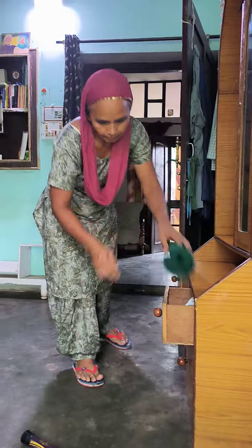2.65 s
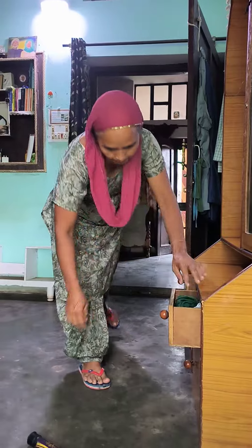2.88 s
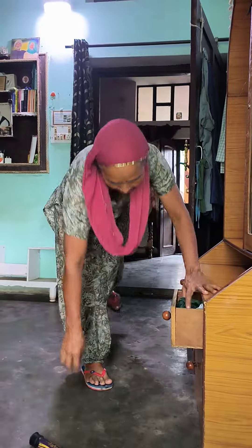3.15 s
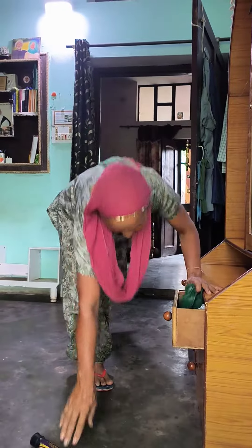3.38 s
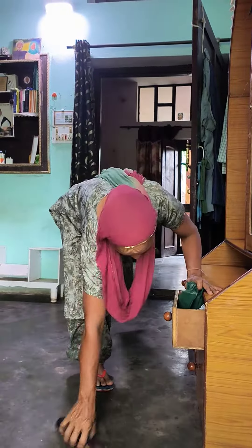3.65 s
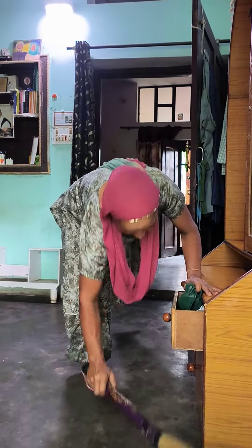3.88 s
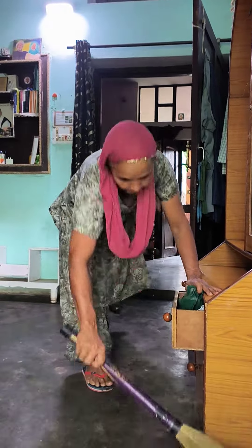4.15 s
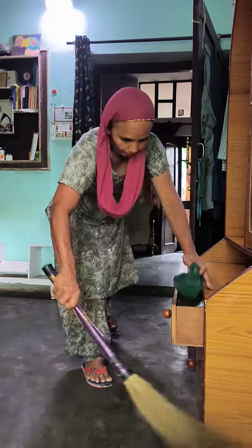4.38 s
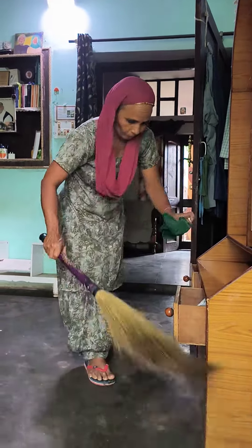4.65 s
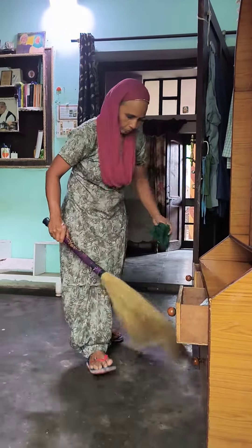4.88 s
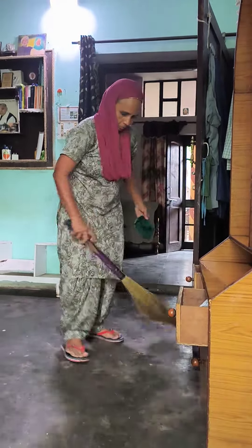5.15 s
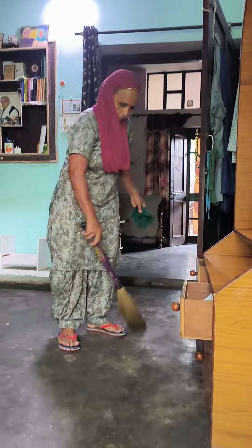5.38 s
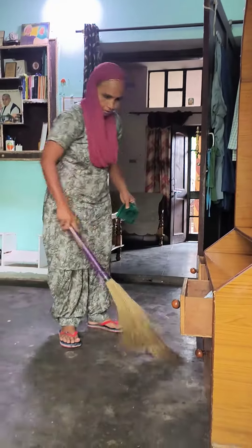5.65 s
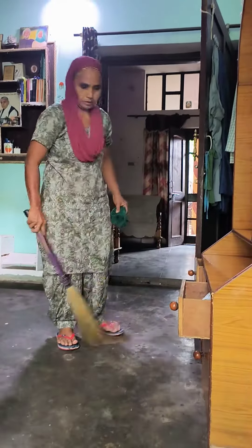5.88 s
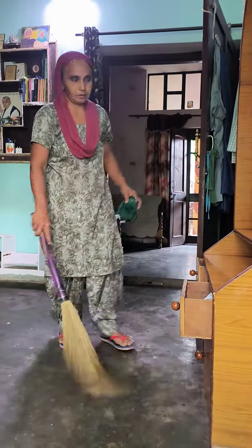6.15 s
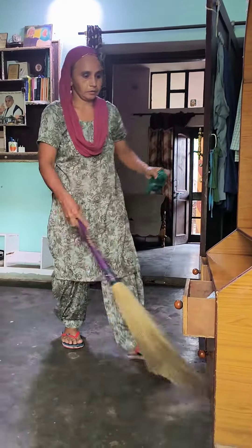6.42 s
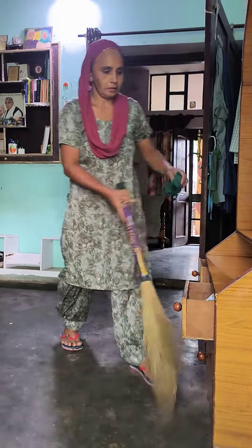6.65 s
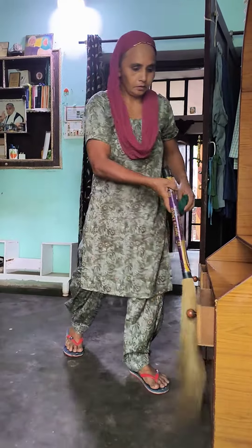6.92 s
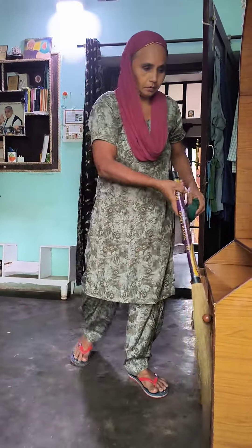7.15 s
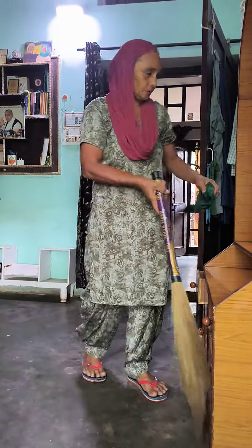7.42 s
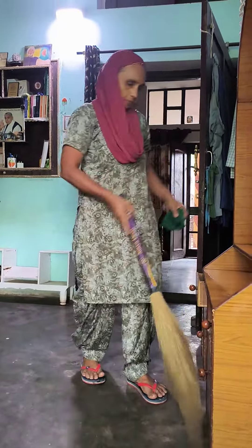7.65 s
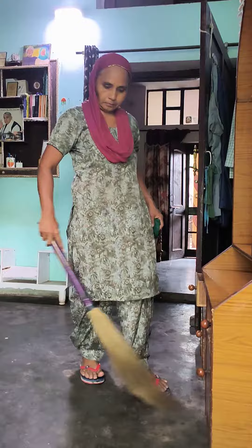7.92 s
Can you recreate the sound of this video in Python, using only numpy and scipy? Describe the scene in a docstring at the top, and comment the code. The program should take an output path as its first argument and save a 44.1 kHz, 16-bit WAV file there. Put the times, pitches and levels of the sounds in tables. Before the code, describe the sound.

In a small hard-floored room, a wooden drawer rumbles and knocks, with one loud hollow slap at half a second and a sharp crack soon after. Small taps and soft cloth-like scrapes follow, then dry grass broom strokes on concrete. Near seven seconds the drawer rumbles and slams shut with the loudest boomy thuds. Birds chirp faintly outdoors. Close phone stereo microphones, short room echo.

```python
"""A small room with a concrete floor: a wooden cabinet's drawer rumbles, cracks, slaps and is knocked
shut, its body drones on, a grass broom sweeps in short strokes, small hard things tap on floor and wood.
Birds call outside over a patchy outdoor wash and a low rumble, partly the cabinet ringing on after knocks;
a pair of phone microphones listens. Strokes, slides, wash and rumble are shaped noise; knocks and taps are
dying sines with bursts of noise; near birds are bending sines, far flocks are narrow bands of noise."""
import sys
import numpy as np
from scipy import signal
from scipy.fft import rfft, irfft, next_fast_len
from scipy.io import wavfile
from scipy.ndimage import uniform_filter1d, map_coordinates

SR = 44100
rng = np.random.default_rng(int(sys.argv[2]) if len(sys.argv) > 2 else 0)


def linear_from_db(decibels):
    """Turn decibels (scalar or array-like) into linear amplitude factors; 0 gives 1."""
    return 10 ** (np.asarray(decibels, float) / 20)


def to_wav(sig):
    """Store sig (one row per channel, or 1-D mono) as 16-bit WAV at the path in sys.argv[1].

    Samples outside -1..1 are clipped; the rate is SR.
    """
    pcm = np.clip(np.atleast_2d(sig), -1, 1) * 32767
    pcm = np.round(pcm).astype(np.int16)
    wavfile.write(sys.argv[1], SR, pcm.T)  # frames by channels


N = 354160  # samples, about 8 s

# how long echoes last in the room: pitch_hz, time to fall 60 dB (t60_s)
ROOM_ECHO = [(80, 0.28), (200, 0.41), (1000, 0.21), (3000, 0.28), (10000, 0.085)]


def unit(x):
    """Scales a sound to rms 1."""
    return x / np.sqrt(np.mean(x ** 2) + 1e-20)


def along(points, hz):
    """Reads a curve of (Hz, value) points on a log pitch axis."""
    f, v = np.transpose(points)
    return np.interp(np.log(hz + 1), np.log(f + 1), v)


def curves(rows):
    """Gives one value per sample for each column after the time."""
    s, *cols = np.transpose(rows)
    return [np.interp(np.arange(N) / SR, s, c) for c in cols]


def wobble(rate):
    """Draws a smooth random curve with this many knots a second."""
    knots = rng.standard_normal(int(N * rate / SR) + 4)
    return map_coordinates(knots, [np.arange(N) * rate / SR])


def filtered(x, response):
    """Multiplies the spectrum of x by a response that depends on frequency."""
    m = next_fast_len(x.shape[-1] + 8192)
    spectrum = rfft(x, m) * response(np.fft.rfftfreq(m, 1 / SR))
    return irfft(spectrum, m)[..., :x.shape[-1]]


def rush(spectrum, patchy_db, grain_db=0):
    """Stereo noise with random patches of gain; grain_db spreads sample sizes into scratchy grains."""
    # how alike left and right are: pitch_hz, likeness (1 = the same, 0 = unrelated)
    likeness = [(60, 0.71), (180, 0.56), (550, 0.48), (1650, 0.012), (4970, -0.012), (15000, -0.0063)]
    grains = rng.standard_normal((2, N)) * linear_from_db(grain_db * wobble(900))
    z = signal.stft(grains, nperseg=512)[2]
    field = rng.standard_normal(z.shape[1:])
    field = uniform_filter1d(uniform_filter1d(field, size=6, axis=0), size=10, axis=1)
    pair = signal.istft(z * linear_from_db(patchy_db * unit(field)), nperseg=512)[1][:, :N]

    def middle_and_side(hz):
        turn = np.arccos(np.clip(along(likeness, hz), -1, 1)) / 2
        return linear_from_db(along(spectrum, hz)) * np.array([np.cos(turn), np.sin(turn)])

    mid, side = filtered(pair, middle_and_side)
    return np.array([mid + side, mid - side]) / np.sqrt(np.mean(mid ** 2))


def echoes(x, t60s, wet_db, alike):
    """Adds a fresh noise tail per channel, each frequency dying at its own speed."""
    a, b = rng.standard_normal((2, x.shape[-1]))
    turn = np.arccos(np.clip(alike, 0, 1)) / 2
    noise = [np.cos(turn) * a + np.sin(turn) * b, np.cos(turn) * a - np.sin(turn) * b]
    hz, t, z = signal.stft(noise, SR, nperseg=256)
    decay = linear_from_db(-60 * t / along(t60s, hz)[:, None])
    tail = signal.istft(z * decay, SR, nperseg=256)[1]
    tail = linear_from_db(wet_db) * tail / np.linalg.norm(tail[0])
    late = np.pad(np.atleast_2d(x), ((0, 0), (130, 0)))  # the tail starts 3 ms late
    return x + signal.fftconvolve(late, tail, axes=1)[:, :x.shape[-1]]


def add(out, sound, s):
    """Mixes a stereo sound into out at time s, its last fifth faded."""
    part = out[:, round(s * SR):][:, :sound.shape[1]]
    fade = np.minimum(1, 5 * np.linspace(1, 0, sound.shape[1]))
    part += (sound * fade)[:, :part.shape[1]]


def strokes(rows):
    """One gain curve per dB column: every row starts, swells, holds and dies away; powers add."""
    land_db, lift_db_per_s = 11, 178  # starts this far under its peak; dies away this fast
    t = np.arange(0, N + 32, 32) / SR
    s, swell, hold, *levels = np.transpose(rows)[:, :, None]
    u, swell = t - s, np.maximum(swell, .002)
    shape_db = -land_db * np.clip(1 - u / swell, 0, 1)
    shape_db = shape_db - lift_db_per_s * np.maximum(u - swell - hold, 0)
    shape_db = shape_db + 2500 * np.minimum(u, 0)  # steep rise just before the start
    gains = [np.sqrt(np.sum(linear_from_db(2 * (db + shape_db)), axis=0)) for db in levels]
    return [np.interp(np.arange(N) / SR, t, gain) for gain in gains]


def wash_and_rumble():
    """Shaped noise: outdoor wash through the door, and a low rumble, partly the cabinet ringing on."""
    # colour of the outdoor wash: pitch_hz, relative level_db per Hz
    wash_colour = [(12, -26), (20, 23), (182, -11.5), (270, -6.5), (357, -11), (399, -23.5), (434, -13.5),
                   (802, -12.5), (873, 0.5), (1030, -13.5), (2530, -24.5), (3740, -54), (5850, -19.5),
                   (8180, -24.5), (16000, -24)]
    # swelling of the low rumble, partly the cabinet ringing on after knocks: time_s, level_db
    rumble_level = [(0, -48), (1.2, -56.5), (2.6, -59), (3.2, -55), (3.85, -60), (4.4, -51.5), (4.95, -59),
                    (5.4, -55.5), (6, -58.5), (6.8, -56.5), (7.65, -50.5), (8.03, -57)]
    wash = linear_from_db(-58.0 + 0.62 * wobble(3)) * rush(wash_colour, patchy_db=3.0)
    rumble_colour = [(15, -4.5), (35, -9.5), (60, 1.5), (110, -2.5), (300, -12.5), (450, -64.5)]
    rumble = rush(rumble_colour, patchy_db=-1.0)
    return wash + linear_from_db(curves(rumble_level)[0] + 0.5 * wobble(8)) * rumble


def birds():
    """Whistled sines that ring on in the yard, and the blurred noise twitter of two far flocks."""
    # two long whistles that arch and fall, a list of points each: time_s, pitch_hz, level_db
    long_calls = [
        [(6.805, 3590, -57.5), (6.865, 3797, -47), (6.92, 3520, -53), (6.96, 2950, -53), (7.04, 2434, -68)],
        [(7.42, 3440, -55), (7.47, 3720, -53), (7.52, 3810, -49.5), (7.57, 3570, -50), (7.64, 2670, -59)],
    ]
    # short calls, one bend each: start_s, length_s, first_hz, middle_hz, last_hz, level_db
    short_calls = [(2.27, 0.044, 3650, 3190, 2980, -55), (2.809, 0.067, 2070, 2377, 2430, -48.5),
                   (2.82, .1, 5030, 5000, 4510, -66), (3.032, 0.063, 2140, 2343, 2370, -47.5),
                   (3.047, .045, 2930, 3070, 3160, -70), (3.23, 0.029, 2140, 1950, 1900, -52.5),
                   (3.385, .03, 2860, 2960, 2905, -75), (3.62, .06, 3730, 3740, 3470, -59),
                   (5.065, 0.036, 2400, 2330, 2200, -60), (5.55, 0.053, 4200, 3830, 3500, -64),
                   (6.737, .06, 5050, 4970, 4900, -71), (6.95, 0.078, 4420, 4500, 4380, -73)]
    # levels of the two far flocks: time_s, high_flock_db, low_flock_db
    flock_levels = [(0, -68, -70), (.24, -79, -54.5), (.58, -64, -69.5), (.75, -83, -51.5),
                    (1.05, -77.5, -71.5), (1.7, -67, -65), (2.1, -84.5, -62), (2.6, -68, -70),
                    (3.05, -69, -67.5), (3.45, -89, -80), (3.7, -60, -74), (4.3, -79.5, -87),
                    (5.2, -63.5, -97), (6.1, -75, -90), (6.55, -69.5, -62), (7.2, -64, -72),
                    (7.7, -65.5, -65), (8.03, -63, -73)]
    # how long echoes last in the yard: pitch_hz, time to fall 60 dB (t60_s)
    yard_echo = [(2000, .36), (4000, 0.42)]
    out, t = np.zeros((2, N)), np.arange(int(.7 * SR)) / SR
    short = [[(s, a, db - 4.5), (s + d / 2, b, db), (s + d, c, db)] for s, d, a, b, c, db in short_calls]
    for call in long_calls + short:
        s, hz, db = np.transpose(call)
        length_s = s[-1] - s[0]
        fade = np.clip(np.minimum(t, length_s - t) / .012, 0, 1)
        pitch = np.interp(t + s[0], s, hz)
        pitch = uniform_filter1d(pitch, size=int(length_s * SR / 6))  # bends smoothly
        loudness = linear_from_db(np.interp(t + s[0], s, db) + 1.4 * wobble(46.5)[:len(t)])
        note = fade * loudness * np.sin(2 * np.pi * np.cumsum(pitch) / SR)
        add(out, echoes(note, yard_echo, wet_db=3.0, alike=0.083), s[0])
    high_colour = [(4200, -52.5), (4750, -4.5), (5150, -0.5), (5700, -10), (6500, -33.5)]
    low_colour = [(1800, -50.5), (2200, 2.0), (2550, -0.5), (3150, -10.5), (3800, -50)]
    high = rush(high_colour, patchy_db=3.0)
    low = rush(low_colour, patchy_db=8.0)
    high_db, low_db = curves(flock_levels)
    return out + linear_from_db(high_db + 2.2 * wobble(7.9)) * high + linear_from_db(low_db + 3.1 * wobble(9)) * low


def taps():
    """A woody ring of a few cycles, a bright edge and a fine tick; a near wall repeats them."""
    # small hard contacts: start_s, ring_db, ring_hz, bright_edge_db, left_over_right_db
    contacts = [(.225, -39, 664, -47, -2.5), (.28, -28.5, 670, -43, 0), (.491, -46, 535, -48, -6),
                (.388, -42, 600, -50, -2), (.646, -24, 700, -51, 0), (0.676, -25.5, 760, -55, -6),
                (.856, -41.5, 730, -48, 7), (1.294, -37.5, 680, -52, -1), (1.364, -38, 900, -51.5, -1),
                (1.422, -40.5, 940, -59, 1), (1.87, -31, 830, -58, -2), (1.957, -41.5, 1230, -68, -15),
                (2.227, -41.5, 990, -51, -5.5), (2.342, -34.5, 1040, -60, 0.5),
                (2.525, -35.5, 536, -52, -1.5), (2.981, -28, 960, -43.5, -2.5),
                (3.212, -67, 2440, -50.5, -3), (3.44, -42, 990, -49, -5), (3.58, -37, 653, -45.5, -3),
                (3.705, -38.5, 920, -42.5, -5), (3.78, -39.5, 1020, -60, -1), (4.048, -28, 695, -43.5, -1),
                (4.088, -34.5, 2110, -28.5, 0.5), (4.117, -49, 2070, -47, -6.5), (4.161, -44, 519, -50, -1),
                (4.254, -42, 1870, -49, -18), (4.34, -29.5, 673, -40, -2.5), (4.528, -32, 690, -45, -4),
                (4.639, -41.5, 1300, -53, -15), (5.139, -49.5, 784, -52, -9), (5.232, -24, 517, -47, -0.5),
                (5.266, -27.5, 820, -51, 3), (5.289, -29, 457, -41, 0), (5.516, -23.5, 690, -49.5, -2),
                (5.616, -28.5, 566, -46, 2), (5.875, -40, 960, -52, -6), (5.96, -40.5, 1250, -74, -6),
                (6.101, -34.5, 547, -49, -2), (6.4, -45.5, 1010, -56, -7), (5.823, -53, 1000, -54, -3),
                (6.464, -31, 726, -45.5, -2), (6.5, -38, 650, -64, 0), (6.599, -41.5, 571, -65, 0),
                (6.785, -38, 483, -55, -1), (7.059, -56, 450, -36.5, -6.5), (7.094, -37, 807, -41, 1),
                (7.15, -16.5, 468, -30.5, 10), (7.37, -54, 2150, -55, 3), (7.702, -30, 840, -40, 1)]
    out, t = np.zeros((2, N)), np.arange(SR // 3) / SR

    def band(lo_hz, hi_hz):
        return unit(filtered(rng.standard_normal(len(t)), lambda f: (f > lo_hz) * (f < hi_hz)))

    # 14 faint contacts at random times, with the same columns
    faint = [(0.92 + 3.4 * a, -43 - 6 * b, 1500 * 3 ** (c - .5), -48.5 - 8 * b, -8 * d)
             for a, b, c, d in rng.random((14, 4))]
    partials = ((1, 0.56), (1.55, -0.38), (2.4, 0.47), (3.3, 0.31))  # pitch ratio, size
    for s, db, ring_hz, edge_db, pan_db in contacts + faint:
        decay = linear_from_db(-60 * ring_hz * t / 11)  # 60 dB down after 11 cycles
        ring = decay * sum(g * np.sin(2 * np.pi * ring_hz * r * t) for r, g in partials)
        # the contact itself: one push and pull
        ring = ring + 0.99 * np.sin(2 * np.pi * 1100 * t) * (t < 1 / 1100)
        edge = linear_from_db(edge_db - 60 * t / 0.016) * band(1700, 7300)
        tick = linear_from_db(edge_db - 14 - 60 * t / 0.0085) * band(7200, 15800)
        tap = linear_from_db(db) * ring + edge + tick
        tap = tap + 0.18 * np.roll(tap, round(.0078 * SR))  # near wall
        pair = echoes(tap, ROOM_ECHO, wet_db=-5.0, alike=.2) * linear_from_db([[pan_db / 2], [-pan_db / 2]])
        # most contacts lie 9 cm nearer the left microphone
        pair[1] = np.roll(pair[1], 11 if pan_db > -6 else 0)
        add(out, pair, s + .0009)
    return out


def broom_and_drawer():
    """Stalks scrape in grains, tips hiss, the bundle drags; the drawer scrapes, cracks, drags, rumbles."""
    # strokes of grass, cloth or sandal on concrete: start_s, swell_s, hold_s, scrape_db, tip_hiss_db
    sweep_rows = [(.06, 0.16, 0.063, -53, -57.5), (.81, 0.021, .04, -58, -61.5),
                  (1.478, 0.0047, .01, -78, -49.5), (1.55, .03, .05, -62, -61),
                  (1.7, 0.0069, 0.13, -52, -53), (2.06, .02, 0.028, -74, -66.5),
                  (2.27, 0.068, .02, -55, -61.5), (2.42, 0.091, 0.073, -56.5, -62.5),
                  (2.7, 0.0078, 0.017, -62, -59.5), (3.098, 0.0027, 0.0091, -77, -59.5),
                  (3.695, .015, .075, -49, -50), (4.18, 0.013, .03, -57, -51.5),
                  (4.25, 0.0083, 0.03, -57, -53), (4.51, 0.025, 0.033, -58.5, -55.5),
                  (4.62, 0.014, 0.016, -58.5, -54.5), (5.07, 0.021, 0.077, -61, -56.5),
                  (5.225, .01, .06, -45.5, -48.5), (5.29, 0.04, 0.045, -41, -45.5),
                  (5.55, 0.064, 0.03, -54.5, -49), (5.86, 0.017, 0.042, -65, -64),
                  (6.09, .1, 0.091, -64.5, -54.5), (6.862, 0.0057, .03, -54, -52.5),
                  (7.055, .003, 0.003, -71, -46.5), (7.22, 0.088, .08, -68, -60.5),
                  (7.38, 0.064, 0.046, -49, -50.5), (7.86, 0.027, 0.19, -59, -67.5)]
    # the drawer slides and its contents shift; the very short row at .8555 s is a sharp crack:
    # start_s, swell_s, hold_s, scrape_db, low_drag_db, rumble_db
    drawer_rows = [(.04, 0.089, 0.13, -53.5, -44, -41), (.58, 0.013, 0.11, -50.5, -43.5, -54.5),
                   (.72, 0.013, .12, -69, -49, -46), (.8555, 0.0013, 0.0046, -39, -40, -37),
                   (.88, 0.016, 0.024, -64, -47, -52.5), (.95, 0.011, 0.067, -71, -53, -53),
                   (6.88, 0.038, .12, -62, -54.5, -50.5), (7.05, 0.13, 0.051, -50, -39.5, -32.5),
                   (7.26, 0.038, 0.078, -61, -51, -48)]
    # colour of the scrape: pitch_hz, relative level_db per Hz
    scrape_colour = [(900, -55), (1500, -15.5), (1800, 0.5), (2100, 3.5), (2500, 1), (3300, -1.5),
                     (4500, -4), (6000, -4), (7100, -12), (8000, -42.5), (10000, -67)]
    # colour of the hissing fine tips: pitch_hz, relative level_db per Hz
    tip_colour = [(4350, -4), (7400, 0), (7760, -7.5), (8090, -6), (9100, -2), (10000, -2), (11300, 0),
                  (13700, -2), (15200, -1.5), (15800, 5)]
    # colour of the low drag: pitch_hz, relative level_db per Hz
    drag_colour = [(200, -37.5), (330, 0), (600, -4.5), (1200, -5.5), (1650, -7), (2300, -36.5)]
    # cloth and feet never rest: a faint, slowly swinging floor under each layer
    scrape, tips, drag = [linear_from_db(db + 2.5 * wobble(5)) for db in (-61.5, -70.5, -61)]
    swept, hiss = strokes(sweep_rows)
    drawer_scrape, drawer_drag, boom = strokes(drawer_rows)
    scrape = np.hypot(scrape, np.hypot(swept, drawer_scrape))
    tips = np.hypot(tips, hiss)
    drag = np.hypot(drag, np.hypot(linear_from_db(-11) * swept, drawer_drag))  # bundle drags 11 dB under its scrape
    catch = linear_from_db(.9 * wobble(40))  # stalks catch and let go together
    scrape = scrape * catch * rush(scrape_colour, patchy_db=1.3, grain_db=2.6)
    tips = tips * catch * rush(tip_colour, patchy_db=2.0, grain_db=1.5)
    drag = drag * linear_from_db(0.87 * wobble(30)) * rush(drag_colour, patchy_db=4.0, grain_db=2.5)
    boom_colour = [(30, -32), (70, -4.5), (130, -3.5), (300, -6.5), (450, -60)]
    boom = boom * rush(boom_colour, patchy_db=4.0)
    return scrape + tips + boom + drag


def knocks():
    """Each blow drives the panels nearest its pitch; the last row, at 7.42 s, is the cabinet droning on."""
    # blows on the cabinet, and in the last row its lingering drone: start_s, ring_peak_db before echoes,
    # best_driven_hz, share of free ring time, dullness (db lost per octave above the best-driven pitch)
    ring_rows = [(.024, -32.5, 123, 0.55, 14), (.078, -29, 159, 0.44, 9.5), (.1, -11.5, 126, 0.64, 17),
                 (.149, -20, 125, 0.21, 23.5), (.212, -23, 129, 0.39, 27), (.279, -26, 121, 0.65, 8.5),
                 (0.375, -32, 126, 0.25, 9.5), (.5369, -3.5, 240, 0.4, 1), (.799, -39, 228, 1.3, 23),
                 (.856, -32, 168.4, .58, 3), (.93, -36, 118, 0.55, 8), (1.001, -29.5, 222, 0.56, 37),
                 (1.03, -29, 228, 0.25, 26), (1.1, -40, 228, 0.34, 14), (3.271, -46, 228, 0.44, 36),
                 (5.65, -39, 228, 0.23, 21), (6.867, -26, 161, 0.38, 12.5), (6.885, -26, 154, 0.84, 28),
                 (7.082, -19.5, 120, 0.36, 35), (7.134, -10.5, 149, 0.44, 13.5),
                 (7.148, -1.5, 156, 0.18, 12.5), (7.175, -1, 172, .3, 5.5), (7.199, -11, 104, 0.27, 10),
                 (7.29, -24, 89, .73, 17.5), (7.42, -38.5, 120, 5.7, 11)]
    # ways the cabinet panels ring: pitch_hz, level_db (weighted by 0.54 below), free t60_s
    panels = [(78, -20, 0.54), (120, 8.5, 0.27), (149, -2, 0.2), (173.6, -4.5, 0.29), (228, -1, 0.24),
              (283.8, -8.5, 0.39), (322.7, -1.5, 0.31), (375, -7.5, 0.31), (410, -18, 0.16),
              (471.5, -9, 0.12), (490, -7.5, 0.13), (566, -24, 0.067), (649, -3.5, 0.15), (717, 5.5, 0.36),
              (753, -16, 0.21), (828, -12.5, 0.63), (893, 5, 0.14), (1006, -1.5, 0.15), (1000, -18, 0.14),
              (1318, -36, .16), (1444, 6.5, 0.11)]
    # colour of the clap of wood on wood: pitch_hz, relative level_db per Hz
    clap_colour = [(240, -21.5), (400, -3.5), (1360, -9.5), (1630, -17), (2090, -15.5), (3300, -33.5),
                   (3910, -32), (6090, -34), (9000, -62), (11700, -72), (19800, -120)]
    out, t = np.zeros((2, N)), np.arange(int(.7 * SR)) / SR
    hz, level_db, t60 = np.transpose(panels)[:, :, None]
    for s, db, best_hz, free, slope_db in ring_rows:
        octaves = np.log2(hz / best_hz)
        reach_db = np.where(octaves > 0, -slope_db * octaves, 22 * octaves)  # larger panels hardly move
        reach_db = reach_db + 0.54 * level_db + rng.normal(0, 2.6, hz.shape)
        # small panel lobes reach each microphone unlike: about one radian apart at 620 Hz
        turn = [[[.5]], [[-.5]]] * rng.normal(0, 1, hz.shape) * hz / 620
        modes = linear_from_db(reach_db - 60 * t / (free * t60)) * np.sin(2 * np.pi * hz * t + turn)
        ring = np.sum(modes, axis=1)
        # a duller row builds up more slowly
        ring = ring * (1.0 - np.exp(-t * best_hz / (0.026 * max(slope_db, 1))))
        # panels radiate little below their pitch
        ring = filtered(ring, lambda f: (1j * f / (1j * f + 0.69 * best_hz)) ** 2)
        ring = linear_from_db(db) * ring / np.max(np.abs(ring))
        clap = unit(filtered(rng.standard_normal(len(t)), lambda f: linear_from_db(along(clap_colour, f))))
        clap_db = db - 3.5 - 0.88 * slope_db  # duller rows clap less
        clap = linear_from_db(clap_db - 60 * t / 0.06) * clap * (1 - np.exp(-t / 0.0014))
        ring = echoes(ring, ROOM_ECHO, wet_db=-5.5, alike=1.0)
        clap = echoes(clap, ROOM_ECHO, wet_db=-2.0, alike=0.053)
        add(out, ring + clap, s)
    return out * linear_from_db([[.8], [-.8]])  # a little to the left


def scene():
    """Adds up everything that reaches the two microphones."""
    return wash_and_rumble() + birds() + taps() + broom_and_drawer() + knocks()


def top_cut(x):
    """Nothing passes above the cut-off."""
    return signal.sosfilt(signal.butter(12, 16970, fs=SR, output="sos"), x)


def record(dry):
    """The microphones differ in colour, round off loud peaks and lose deep bass and the top."""
    # difference in colour between the two microphones: pitch_hz, left_over_right_db
    port_colour = [(60, 1), (92, -3), (140, -2), (210, 0.5), (330, -4.5), (500, 2), (770, -1.5),
                   (1170, -2.5), (1790, -6), (2740, -2.5), (4190, -3), (6410, -10.5), (9810, 5),
                   (15000, -7.5)]

    def band(hz):
        return hz ** 2 / (hz ** 2 + 25 ** 2) * np.where(hz < 15850, 1, linear_from_db(-30))

    x = filtered(dry, lambda hz: linear_from_db(along(port_colour, hz) * [[.5], [-.5]]))
    x = x / (1 + np.abs(x) ** 8) ** (1 / 8)  # soft limit at full scale
    return top_cut(filtered(x, band))


dry = scene()
out = record(dry)
to_wav(out)
```